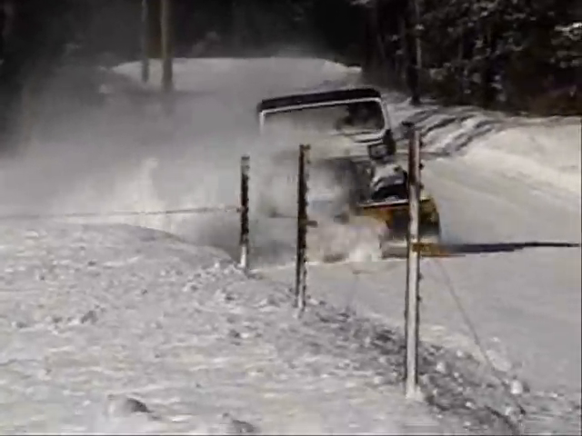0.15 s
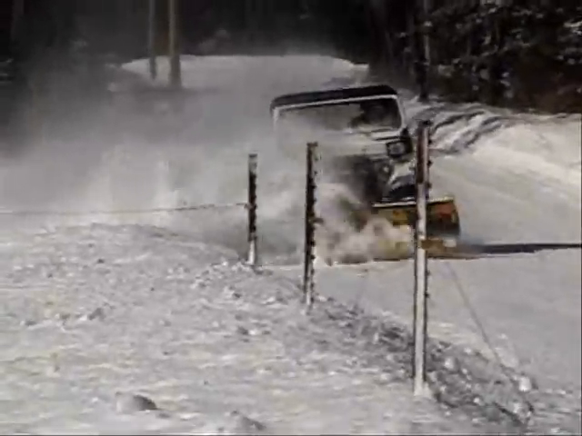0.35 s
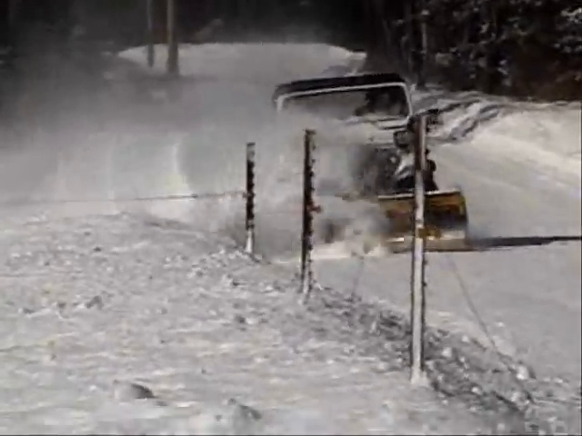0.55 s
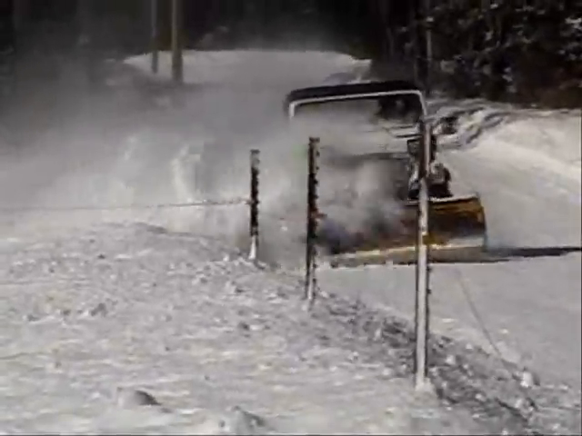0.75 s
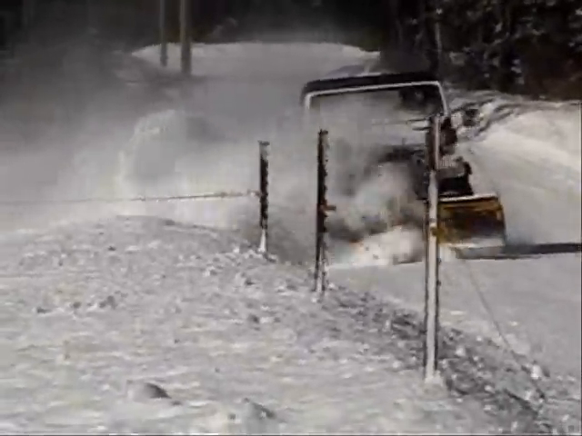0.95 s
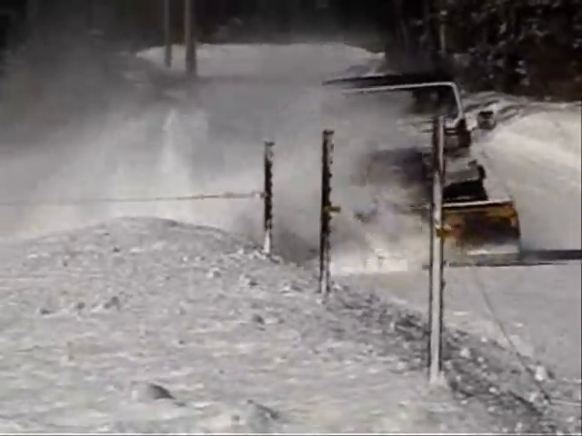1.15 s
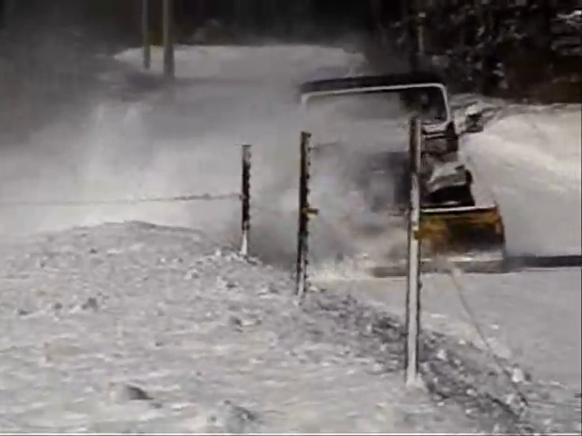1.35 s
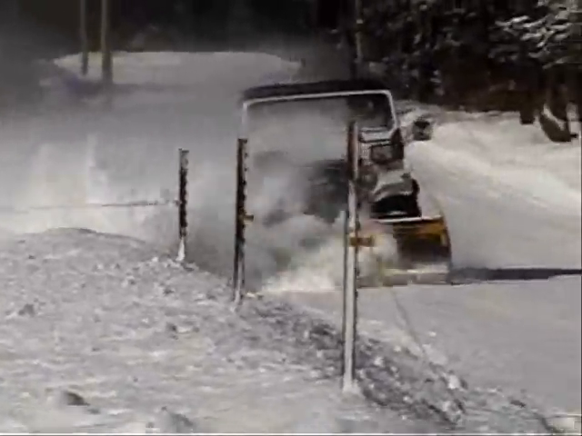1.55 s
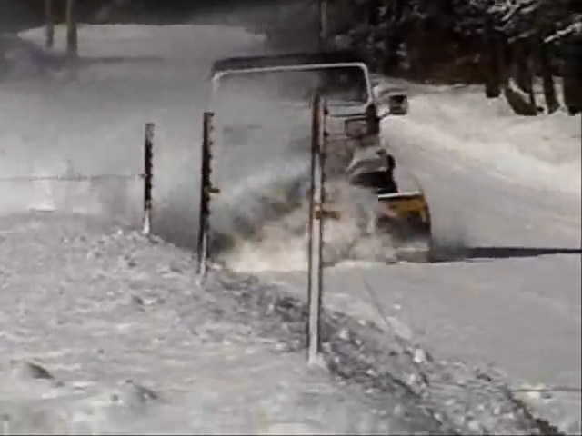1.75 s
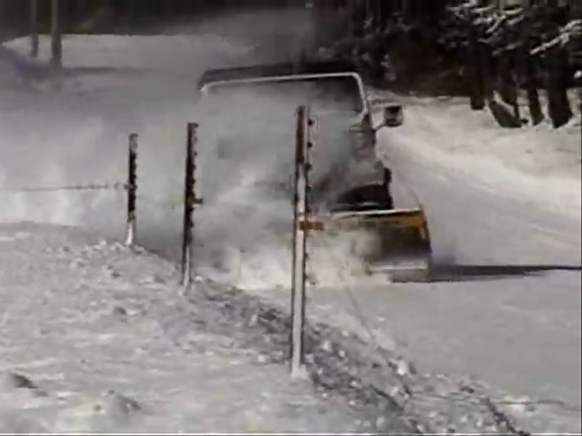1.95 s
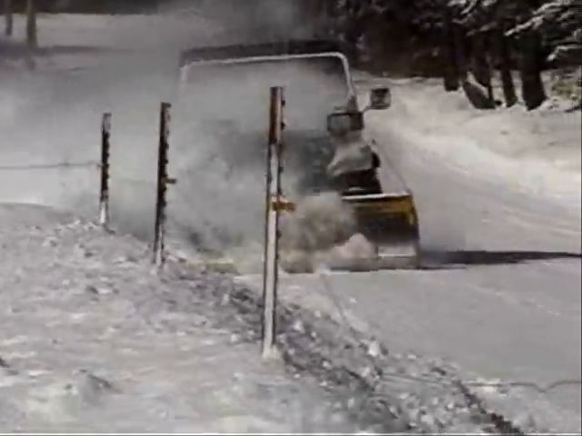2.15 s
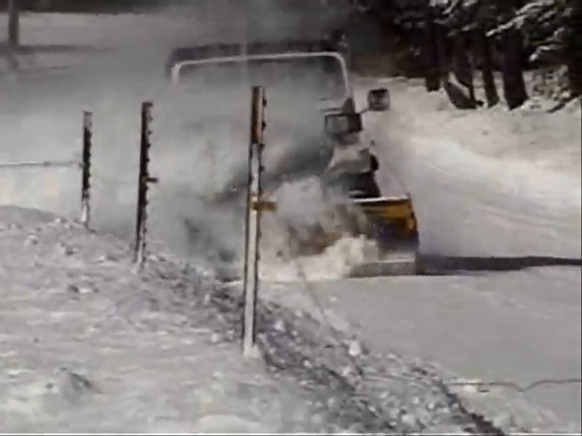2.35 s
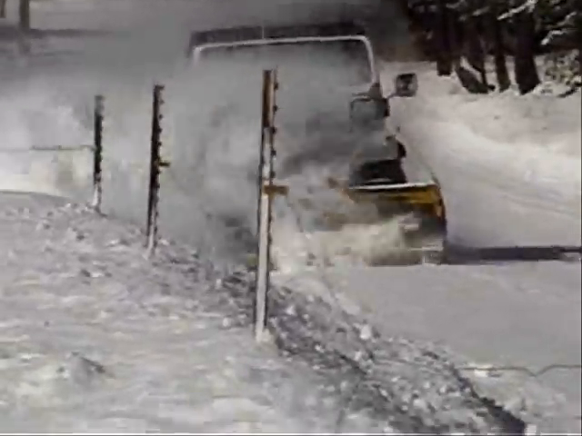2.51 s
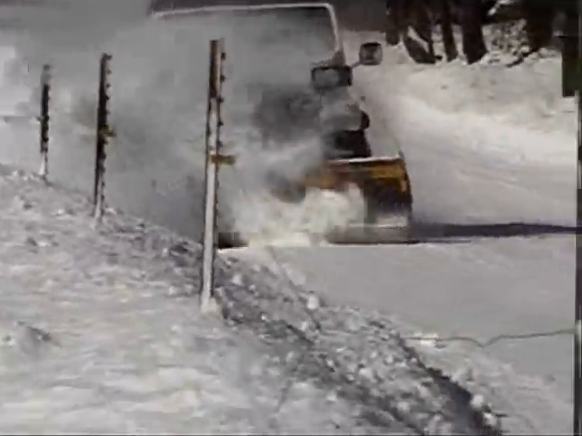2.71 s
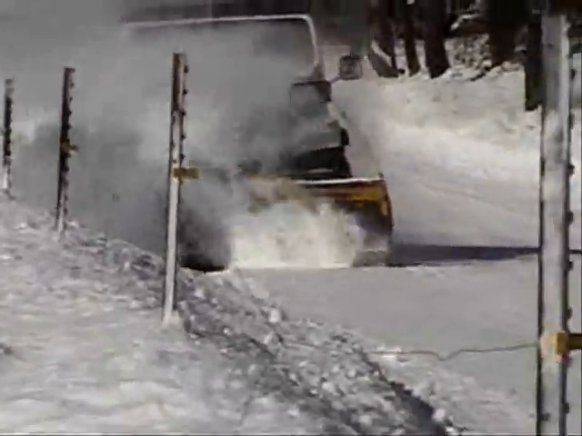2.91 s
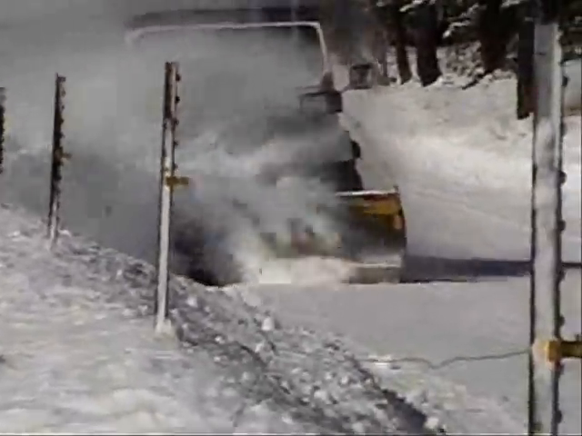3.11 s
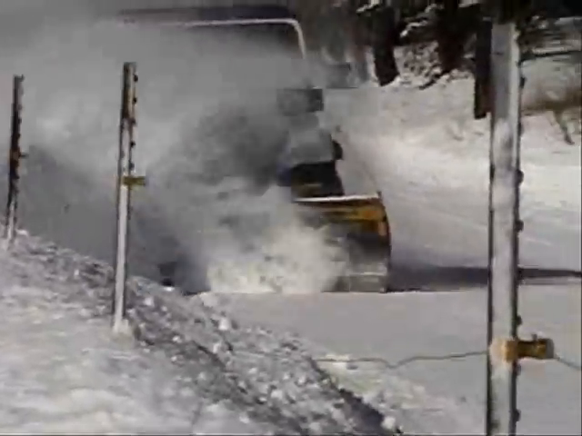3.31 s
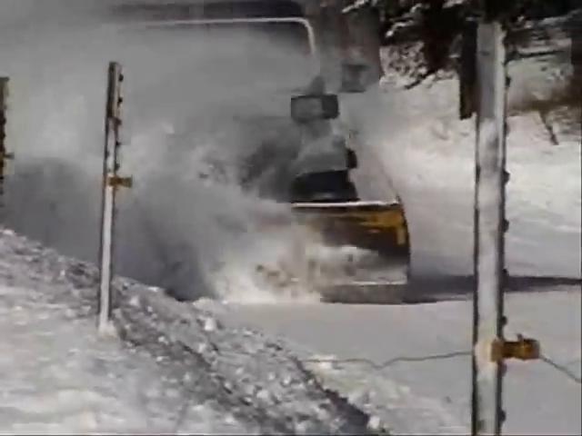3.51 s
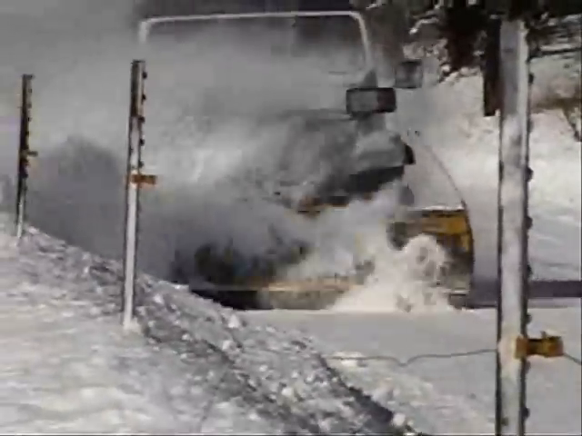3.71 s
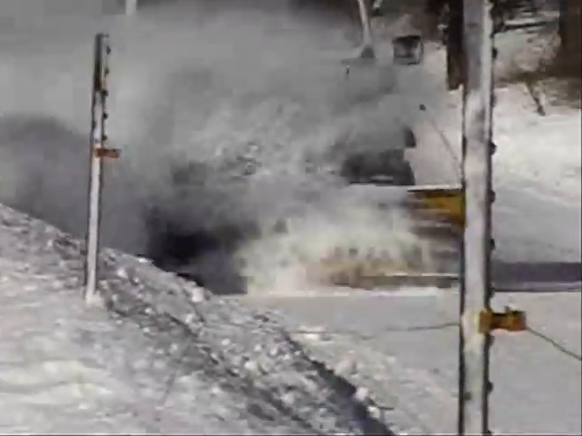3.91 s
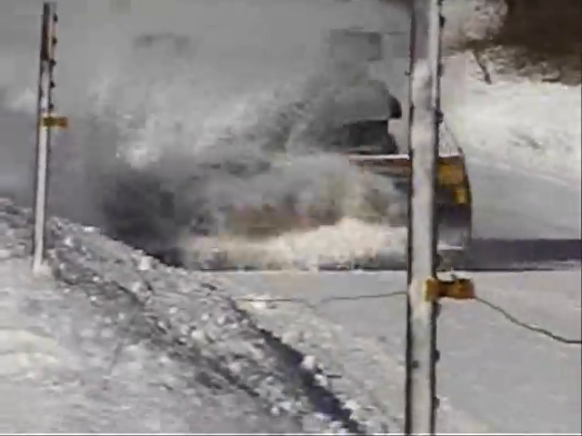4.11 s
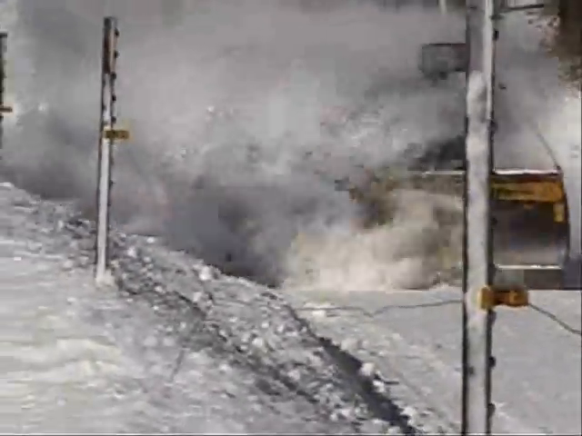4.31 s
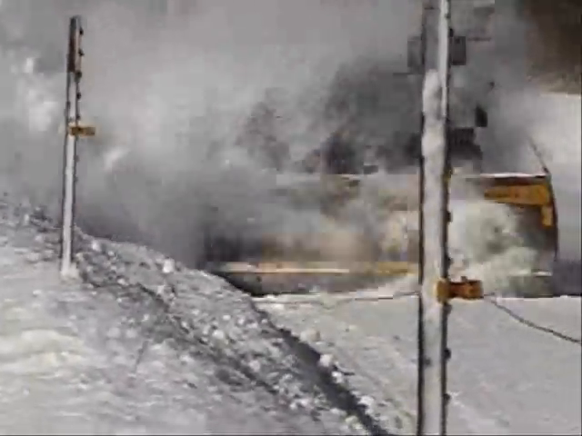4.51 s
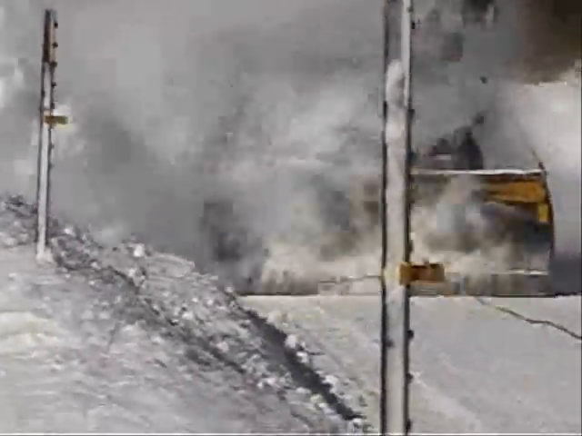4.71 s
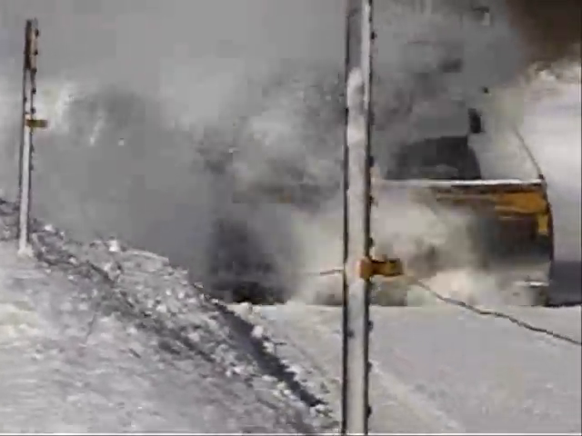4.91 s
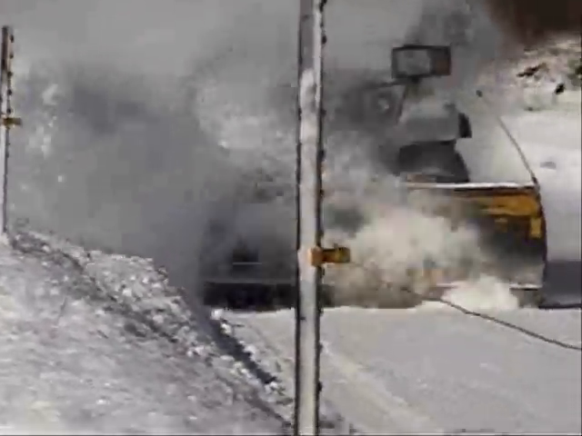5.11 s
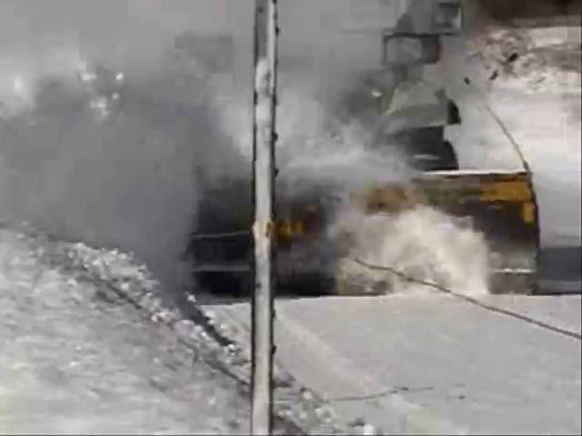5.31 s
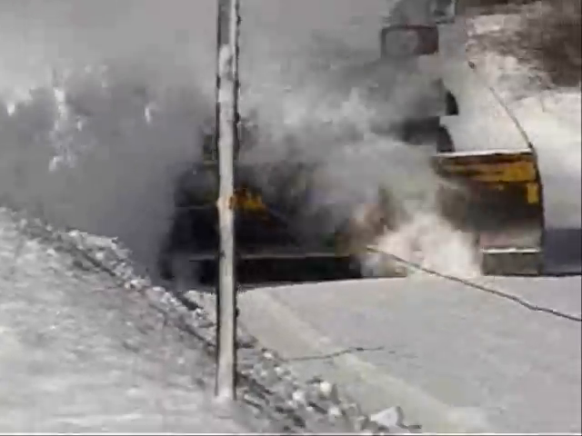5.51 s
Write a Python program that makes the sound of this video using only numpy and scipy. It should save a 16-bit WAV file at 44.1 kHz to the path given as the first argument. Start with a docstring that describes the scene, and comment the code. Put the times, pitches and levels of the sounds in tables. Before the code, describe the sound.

A truck engine drones under load as its steel plow blade rushes through snow, crunching and thudding, steadily drawing nearer and louder.

```python
"""A four-wheel-drive car draws near, pushing a steel plow blade through snow.
From the start the exhaust drones as sines on engine orders, a panel mode of the blade booms,
filtered noise rushes as sliding snow, slabs break in noise swells, and a faint whine and hiss lie below.
Blows on frozen lumps soon ring the blade's decaying modes, and the plow grows louder.
Late on, steel squeaks on ice in short unsteady tones and ice grains tick in bursts of treble."""
import sys
import numpy as np
from scipy import signal
from scipy.fft import rfft, irfft, next_fast_len
from scipy.io import wavfile
from scipy.ndimage import uniform_filter1d, map_coordinates

SR = 44100
rng = np.random.default_rng(int(sys.argv[2]) if len(sys.argv) > 2 else 0)


def bounce(signal):
    """Save signal as a 16-bit WAV file at the path given by the first command-line argument."""
    frames = np.transpose(np.atleast_2d(signal))
    limited = np.clip(frames, -1, 1)
    pcm = np.round(limited * 32767).astype(np.int16)
    wavfile.write(sys.argv[1], SR, pcm)


N = 244755
TIME = np.arange(N) / SR
TOP_HZ = 8064  # upper band limit

# the car draws near: (time [s], gain [dB])
NEARNESS = [(0, -4), (.3, -4), (.9, -1.5), (1.7, -2.5), (2.3, -1.5), (2.75, 0), (3.2, 0), (3.9, 1.5),
            (4.3, 3.5), (4.9, 5), (5.3, 4), (5.55, 5)]
# blows of the blade on frozen lumps: (time [s], middle modes [dB], low modes re middle [dB],
# high modes re middle [dB], peak of the boom's swell [dB rms])
BLOWS = [(.045, -40, -3, -5, -36.5), (0.199, -46, 0, -3, -37), (.356, -44, -5, 9, -34),
         (.576, -37, 3, -9, -30), (0.798, -38.5, 5, -3, -32.5), (.967, -37.5, -8, 1, -39),
         (1.169, -37, -18, -1, -47), (1.715, -40, 13.5, -7, -45), (1.927, -41, -3, 0, -31.5),
         (1.966, -43, -2, -4, -24.5), (2.159, -41.5, 4, -8, -40.5), (2.286, -37, 7, -5.5, -26.5),
         (2.399, -43, 2.5, -3, -30), (2.476, -36.5, -1, -11, -25), (2.545, -32.5, 6.5, -1.5, -22),
         (2.659, -33.5, 6, -5, -23), (2.784, -29.5, -3, 1, -27.5), (2.866, -33.5, 5, -5, -31),
         (2.889, -35.5, 7, 5.5, -42), (3.097, -31.5, 3, 0, -29), (3.171, -29.5, 5, -10, -24),
         (3.242, -34.5, 9.5, -10, -33.5), (3.308, -30, -9, -9, -48), (3.481, -28.5, -15, -6, -29.5),
         (3.554, -33, 2, -1, -34), (3.694, -31.5, -3, -11, -31.5), (3.75, -36, -7, -5, -30),
         (3.86, -26.5, -11, -2, -33), (3.923, -25.5, 2, -12, -26), (3.968, -31, -2, 7, -42),
         (4.055, -23, 4.5, -4.5, -27.5), (4.175, -26.5, 0.5, -9.5, -20), (4.293, -23.5, -7, -20, -24),
         (4.377, -28, -11, -4, -29.5), (4.519, -36, 1, 9, -46), (4.573, -37, -4, -2, -54),
         (4.643, -28, -10, -5, -27), (4.695, -30, 7.5, -1, -14), (4.835, -21, -4, -2.5, -17),
         (4.949, -26, 3.5, -3.5, -21), (4.988, -29, -10, -5, -23.5), (5.074, -24.5, -7, -11, -32.5),
         (5.2, -39, -2, -5, -25), (5.235, -25, -4, -0.5, -28), (5.294, -29.5, -4, -.5, -26.5),
         (5.372, -17, -16, -9, -29), (5.391, -21.5, 7.5, 2, -23), (5.47, -25.5, 4, -4, -32)]


def amp(db):
    """Decibels express the logarithm of an amplitude ratio."""
    return 10 ** (np.asarray(db) / 20)


def unit(x):
    """Normalization by the root mean square, which measures mean power."""
    return x / np.sqrt(np.mean(x ** 2) + 1e-20)


def along(points, hz):
    """Interpolation of (frequency [Hz], value) points on a logarithmic frequency axis."""
    point_hz, value = np.transpose(points)
    return np.interp(np.log(hz + 1), np.log(point_hz + 1), value)


def curves(rows):
    """Linear interpolation in time: one value per sample for each column after the time."""
    s, *columns = np.transpose(rows)
    return [np.interp(TIME, s, column) for column in columns]


def wobble(rate):
    """Slow random modulation: a spline through random knots, rate of them a second."""
    knots = rng.standard_normal(int(N * rate / SR) + 4)
    return map_coordinates(knots, [TIME * rate])


def tone(hz):
    """Phase is the integral of frequency: a sine of rms 1 that follows a pitch curve."""
    cycles = np.cumsum(hz) / SR + rng.random()
    return np.sqrt(2) * np.sin(2 * np.pi * cycles)


def filtered(x, response):
    """Linear filtering: the spectrum of x times a complex response of frequency."""
    m = next_fast_len(N + SR // 2)
    spectrum = rfft(x, m) * response(np.fft.rfftfreq(m, 1 / SR))
    return irfft(spectrum, m)[..., :N]


def rush(gain, patchy_db):
    """Interaural coherence: patchy stereo noise of rms 1 with set likeness, level and phase differences."""
    # (frequency [Hz], left-right correlation [1])
    likeness = [(60, 1), (240, 1), (470, 0.9), (940, 0.9), (1880, 0.99), (3750, 0.86), (6000, 0.98),
                (7500, 1)]
    # (frequency [Hz], left minus right [dB])
    lean = [(500, 0), (870, -.8), (1490, -1.5), (2550, -2.7), (4370, -.3), (7460, 0)]
    # (frequency [Hz], phase by which the left leads [rad])
    lead = [(0, 0.14), (950, -0.0043), (1210, -1.3), (1550, -0.61), (2150, -0.59), (2840, 0.19),
            (4050, 0.81), (4820, 0.28), (6500, 0)]
    # random gain, smoothed over neighbouring times and frequencies
    z = signal.stft(rng.standard_normal((2, N)), nperseg=512)[2]
    field = uniform_filter1d(rng.standard_normal(z.shape[1:]), 6, 0)
    field = uniform_filter1d(field, 6, 1)
    pair = signal.istft(z * amp(patchy_db * unit(field)), nperseg=512)[1]
    # the share of mid and side sets the correlation of the ports
    m = next_fast_len(N)
    hz = np.fft.rfftfreq(m, 1 / SR)
    turn = np.arccos(np.clip(along(likeness, hz), -1, 1)) / 2
    mid, side = rfft(pair, m) * gain(hz) * [np.cos(turn), np.sin(turn)]
    half = np.array([[.5], [-.5]])  # each port takes half of a difference
    ports = amp(half * along(lean, hz)) * np.exp(1j * half * along(lead, hz))
    return unit(irfft([mid + side, mid - side] * ports, m)[:, :N])


def engine():
    """Harmonic synthesis: uneven firings sound orders of the four-stroke cycle, each wavering a little."""
    # (time [s], four-stroke cycles [Hz])
    speed = [(0, 16.1), (.4, 16.2), (1.21, 17.7), (1.55, 17.5), (1.92, 17.5), (2.8, 18.35), (4.1, 16.9),
             (5.55, 16.9)]
    # loudness, which also grows with load: (time [s], orders below the 8th [dB rms], 8th and above [dB rms])
    exhaust = [(0, -42, -40), (.35, -40.5, -39), (1, -35, -35), (1.64, -37, -37), (2.06, -34, -34.5),
               (2.78, -35.5, -35), (3.3, -34.5, -36), (4.13, -31, -30), (4.4, -31, -31.5),
               (5.55, -27, -28.5)]
    # multiples of the cycle [1]
    orders = (4, 5, 6, 7, 8, 9, 10, 11, 13)
    # one row per order: (level re the exhaust loudness [dB], depth of wavering [dB])
    order_levels = [(-28.5, 5), (0, 0.2), (-6, 2), (-7.5, -0.5), (-1.5, 2), (-8, 2), (-9.5, 3.5), (-9, 0),
                    (-12, 3)]
    (cycle_hz,) = curves(speed)
    low_db, high_db = curves(exhaust)
    drone = 0
    for k, (db, waver_db) in zip(orders, order_levels):
        exhaust_db = low_db if k < 8 else high_db
        drone = drone + amp(exhaust_db + db + waver_db * wobble(4)) * tone(k * cycle_hz)
    return drone


def boom():
    """Forced vibration: the ground keeps a panel mode humming near 200 Hz; each blow swells it briefly."""
    # the pitch of the boom wanders: (time [s], pitch [Hz])
    boom_pitch = [(0, 202), (.6, 205), (.9, 200), (1.5, 208), (1.75, 195), (2, 205), (2.65, 201),
                  (2.82, 190), (2.95, 205), (3.2, 205), (3.42, 197), (3.75, 206), (4.03, 194), (4.35, 207),
                  (4.85, 206), (5.12, 194), (5.22, 204), (5.55, 196)]
    rise_s, fall_s = 0.013, 0.041
    hum_db = -42  # between blows, rms at nearness gain 0
    (near_db,), (hz,) = curves(NEARNESS), curves(boom_pitch)
    since_peak = np.arange(SR // 4) / SR - rise_s
    width_s = np.where(since_peak < 0, rise_s / 2, fall_s)
    shape = np.exp(-(since_peak / width_s) ** 2)
    swell = np.zeros(N + SR)
    for s, *_, boom_db in BLOWS:
        swell[round(s * SR):][:len(shape)] += amp(boom_db) * shape
    hum = amp(hum_db + near_db + 3.45 * wobble(14))
    return (swell[:N] + hum) * tone(hz + 3 * wobble(25))


def snow():
    """Broadband friction noise: snow slides up the blade, powder blows off, tyres and blade grind the ground."""
    # grinding over the ground: (frequency [Hz], relative density [dB per Hz])
    rumble_spectrum = [(15, -44), (30, -21), (60, -16), (90, -11.5), (130, -5.5), (180, -5.5), (230, -9.5),
                       (267, -13), (335, -13.5), (500, -16), (650, -17), (800, -37.5), (1200, -45),
                       (2000, -120)]
    # snow sliding up the blade: (frequency [Hz], relative density [dB per Hz])
    slide_spectrum = [(410, -24.5), (700, 0), (810, -0.5), (1420, -4), (2050, -3), (2500, -6.5),
                      (3500, -10), (4200, -20.5), (6000, -60.5)]
    # powder blowing off: (frequency [Hz], relative density [dB per Hz])
    powder_spectrum = [(2000, -39), (3200, -8), (4000, -2.5), (5000, -1.5), (6700, -4), (7500, -5),
                       (9000, -37)]
    rumble_db, slide_db, powder_db = -40.5, -41.5, -49  # rms at nearness gain 0; rumble within 240-700 Hz
    rumble_grows, powder_grows = 1, 1.41  # dB for each dB of nearness
    (near_db,) = curves(NEARNESS)
    lumps = wobble(11)
    rumble = rush(lambda hz: amp(along(rumble_spectrum, hz)), patchy_db=2.4)
    rumble = rumble / np.std(filtered(rumble, lambda hz: (hz > 240) & (hz < 700)))
    rumble = amp(rumble_db + rumble_grows * near_db + 0.14 * lumps) * rumble
    slide = rush(lambda hz: amp(along(slide_spectrum, hz)), patchy_db=0.9)
    slide = amp(slide_db + near_db) * slide
    powder = rush(lambda hz: amp(along(powder_spectrum, hz)), patchy_db=1.24)
    powder = amp(powder_db + powder_grows * near_db) * powder
    return rumble + amp(0.42 * lumps) * (slide + powder)


def slabs():
    """Fracture noise through resonances: a slab crumbles in crunch and spray and makes the edge sing."""
    # slabs of snow breaking: (time [s], reference peak [dB], spray re that [dB], rise time [s])
    breaks = [(0.0365, -25, -24, .017), (.1734, -31.5, -23, .024), (.2784, -35, -20, 0.021),
              (.3494, -33, -32, 0.013), (.4898, -29, -19, .025), (.665, -29.5, -23, 0.021),
              (.7968, -34, -10, 0.017), (0.956, -26.5, -15.5, 0.024), (1.1666, -22.5, -19, 0.014),
              (1.2732, -29.5, -15.5, .019), (1.3904, -37.5, -10, .014), (1.5454, -38, -8.5, 0.014),
              (1.6286, -35, -14, .014), (1.7168, -37, -11, 0.032), (1.8824, -29.5, -39, 0.014),
              (2.5413, -33, -18, 0.013), (2.6404, -29, -19, 0.021), (2.7092, -28, -19, 0.015),
              (2.784, -25, -19.5, .016), (2.8689, -27.5, -21, .017), (2.9754, -27.5, -14, 0.017),
              (3.0845, -30.5, -18, 0.017), (3.1777, -28, -29, 0.014), (3.2428, -29.5, -21, .015),
              (3.3082, -26, -25, 0.015), (3.3862, -23.5, -26, .014), (3.4046, -26, -32, .016),
              (3.48, -22.5, -33, .014), (3.5598, -28, -28, .016), (3.6515, -25, -17.5, 0.017),
              (3.7331, -24, -15, 0.016), (3.862, -24.5, -17.5, 0.015), (3.9367, -26, -18, 0.015),
              (4.065, -20.5, -27, 0.014), (4.137, -24.5, -19.5, 0.021), (4.282, -20.5, -17, 0.012),
              (4.366, -18, -23.5, 0.014), (4.4494, -24, -20.5, 0.02), (4.521, -24.5, -19, 0.014),
              (4.574, -18.5, -19, 0.013), (4.6945, -19.5, -21, 0.017), (4.8244, -16.5, -22, 0.02),
              (4.9437, -17.5, -20, 0.018), (4.9895, -23.5, -21, 0.018), (5.0787, -23, -14.5, .017),
              (5.2244, -21.5, -17, 0.017), (5.2592, -26, -17, 0.021), (5.2894, -23, -22, 0.02),
              (5.3734, -18, -18, 0.016), (5.3919, -17.5, -32.5, 0.017), (5.4675, -22.5, -19, 0.019),
              (5.5169, -21, -27, 0.019)]
    # blade resonances that colour the crunch: (frequency [Hz], width [Hz], level [dB])
    resonances = [(545, 100, 1.5), (1110, 210, 3.5), (1640, 210, 5.5), (2110, 460, 4), (2850, 510, -1.5),
                  (3520, 590, -5.5)]
    crunch_db = -13.5  # re a slab's reference peak
    edge_db, edge_spread_db = -28.5, 2.5  # singing edge re the same peak, and its scatter
    sing_db, sing_grows = -58.5, 1.4  # edge between slabs: rms at gain 0, dB for each dB of nearness
    swells = np.zeros((3, N + SR))  # crunch, edge, spray
    t = np.arange(SR // 4) / SR
    for (s, db, spray_db, rise), chance in zip(breaks, rng.standard_normal(len(breaks))):
        u = t / rise
        start = round((s - .008) * SR)  # the swell creeps in just before it is heard
        levels_db = [[crunch_db], [edge_db + edge_spread_db * chance], [spray_db]]
        swells[:, start:start + len(u)] += amp(db) * amp(levels_db) * u ** 2 * np.exp(2 - 2 * u)
    swells[1, :N] += amp(sing_db + sing_grows * curves(NEARNESS)[0] + 3 * wobble(7.4))

    def coloured(f):
        """Parallel band-pass resonators superpose, here with alternating signs."""
        total = 0
        for k, (centre, width, db) in enumerate(resonances):
            resonator = 1j * f * width / (centre * centre - f * f + 1j * f * width)
            total = total + (-1) ** k * amp(db) * resonator
        return abs(total)

    spray_spectrum = [(1500, -24.5), (3000, 3.0), (8000, -5), (9000, -52)]  # (Hz, dB)
    crunch = rush(lambda f: coloured(f) * (f < TOP_HZ), patchy_db=-0.9)
    edge = rush(lambda f: 1 / (1 + ((f - 2060) / 110) ** 4), patchy_db=0.0)
    spray = rush(lambda f: amp(along(spray_spectrum, f)), patchy_db=2.5)
    grain = amp(1.8 * wobble(180))  # small lumps, common to all three
    # each swell k shapes its own noise in both channels c
    return grain * np.einsum("kn,kcn->cn", swells[:, :N], [crunch, edge, spray])


def whine():
    """A pure tone, thin and steady in pitch with slight amplitude modulation, perhaps a small motor."""
    return amp(-61.5 + 2 * wobble(2.0)) * tone(np.full(N, 2669))


def surroundings():
    """Incoherent noise: air, far echoes of the car and hiss, independent at left and right."""
    # (frequency [Hz], relative density [dB per Hz])
    around_spectrum = [(15, -40), (25, -5), (59, 0.5), (106, -10.5), (202, -7), (1040, -3.5), (1170, -4.5),
                       (1420, -8.5), (1720, -11.5), (2520, -12.5), (2710, -14.5), (5710, -26.5),
                       (6590, -18.5), (7800, -40.5), (10100, -72), (17200, -120)]
    # (time [s], level [dB rms])
    around_level = [(0, -48), (2.5, -45.5), (5.55, -60)]
    (level_db,) = curves(around_level)
    pair = filtered(rng.standard_normal((2, N)), lambda hz: amp(along(around_spectrum, hz)))
    return amp(level_db + 1.1 * wobble(4.6)) * unit(pair)


def bumps():
    """Modal excitation: a blow rings decaying modes; where it lands tilts low against high ones."""
    # the blade under a blow: (frequency [Hz], level [dB], time to decay by 60 dB [s])
    modes = [(139, -2.5, 0.065), (155.3, 6, 0.13), (219, 2.5, 0.11), (281, 4, 0.081), (323.9, 2.5, 0.11),
             (365, -12.5, 0.48), (523.7, 1.5, 0.086), (669, -2.5, 0.086)]
    out = np.zeros(N + SR)
    t = np.arange(SR // 4) / SR
    hz, level_db, t60 = np.transpose(modes)[..., None]
    attack = 1 - np.exp(-t / 0.0031)
    rings = amp(level_db - 60 * t / t60) * np.sin(2 * np.pi * hz * t) * attack
    chance = rng.standard_normal((len(BLOWS), len(modes)))
    for (s, db, low_db, high_db, _), size in zip(BLOWS, chance):
        tilt_db = np.select([hz[:, 0] < 245, hz[:, 0] > 450], [low_db, high_db], 0)
        strengths = amp(db + tilt_db + 2.0 * size)  # 2 dB of scatter per mode
        out[round(s * SR):][:len(t)] += strengths @ rings
    return out[:N]


def squeaks():
    """Stick-slip friction: the steel edge sticks and slips on ice for a moment, an unsteady tone."""
    # (time [s], peak before panning [dB], mean pitch [Hz])
    slips = [(3.6894, -42, 2090), (4.3725, -30.5, 1721), (4.5216, -35, 1624), (4.8254, -29.5, 2011),
             (5.2295, -29, 2101), (5.2844, -39, 2050), (5.5169, -35, 2066)]
    out = np.zeros(N + SR)
    t = np.arange(SR // 10) / SR
    u = t / 0.011  # peaks after 11 ms
    envelope = u ** 2 * np.exp(2 - 2 * u)
    waver = wobble(120)
    for s, db, hz in slips:
        at = round(s * SR)
        pitch = hz + 40 * np.resize(waver[at:], len(t))
        out[at:at + len(t)] += amp(db) * envelope * np.sin(2 * np.pi * np.cumsum(pitch) / SR)
    return out[:N] * amp([[-1], [1]])  # panned to the right


def ticks():
    """Impulsive noise: ice grains tick on steel in short bursts of treble."""
    # (time [s], level at the start [dB rms])
    grains = [(3.9663, -23.5), (4.0042, -33.5), (4.138, -39.5)]
    burst = np.zeros(N)
    t = np.arange(SR // 50) / SR
    for s, db in grains:
        burst[round(s * SR):][:len(t)] += amp(db - 60 * (t / 0.0065) ** 3)  # down 60 dB in 6.5 ms
    treble = [(3000, -13), (4300, -9), (4800, -2), (7500, -10), (9000, -65)]  # (Hz, dB)
    return burst * rush(lambda f: amp(along(treble, f)), patchy_db=0.5)


def scene():
    """Superposition: the pressures of all sources add."""
    plow = boom() + snow() + slabs() + bumps() + squeaks() + ticks()
    return engine() + plow + whine() + surroundings()


def record(dry):
    """Band limitation: a steep low-pass falls off from 400 Hz below the upper limit."""
    return filtered(dry, lambda hz: amp(-90 * np.clip((hz - TOP_HZ + 400) / 600, 0, 2) ** 3))


dry = scene()
out = record(dry)
bounce(out)
```